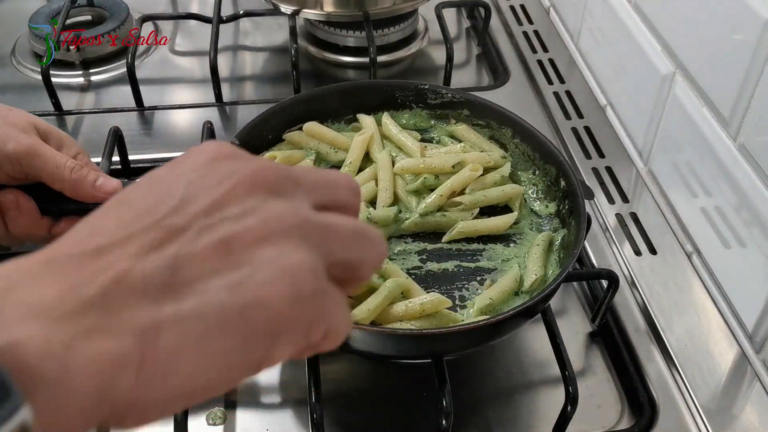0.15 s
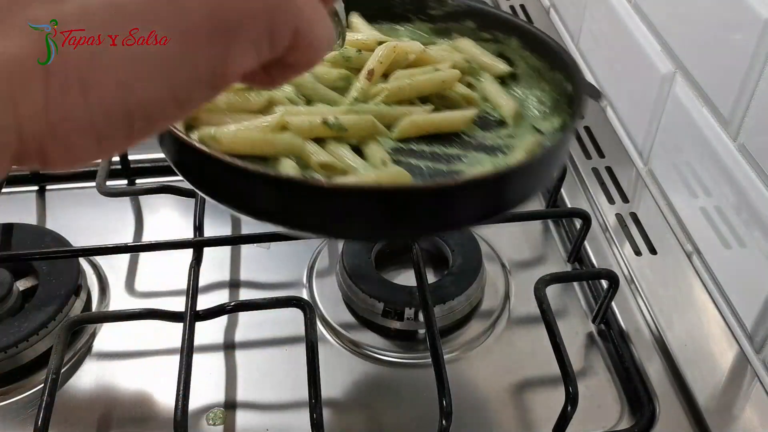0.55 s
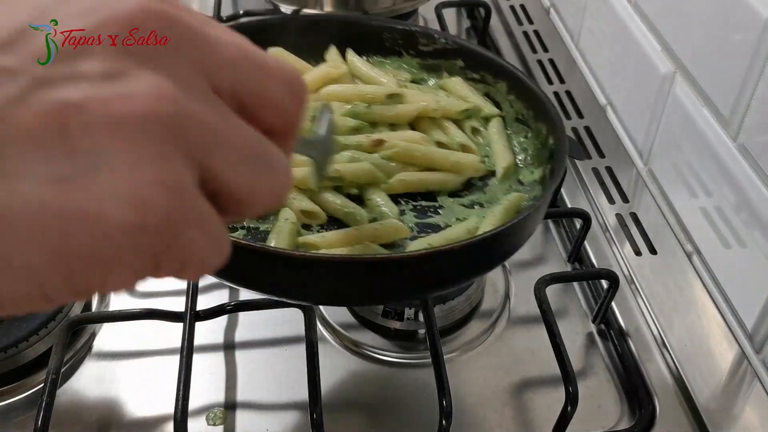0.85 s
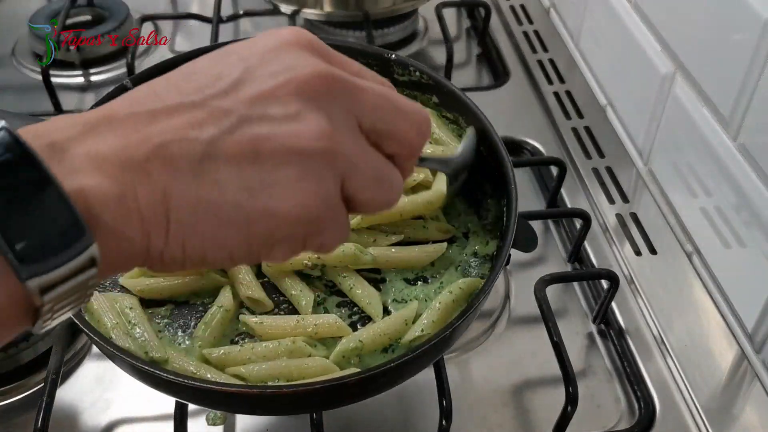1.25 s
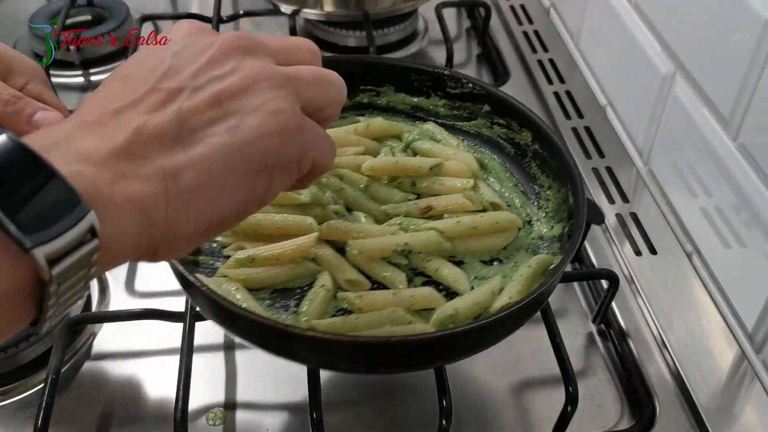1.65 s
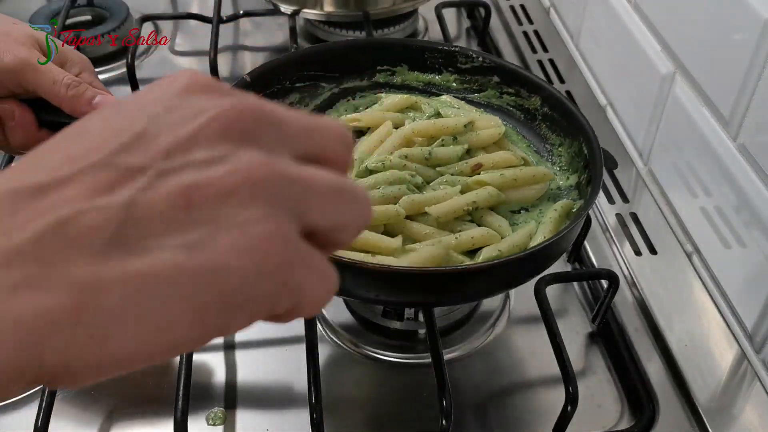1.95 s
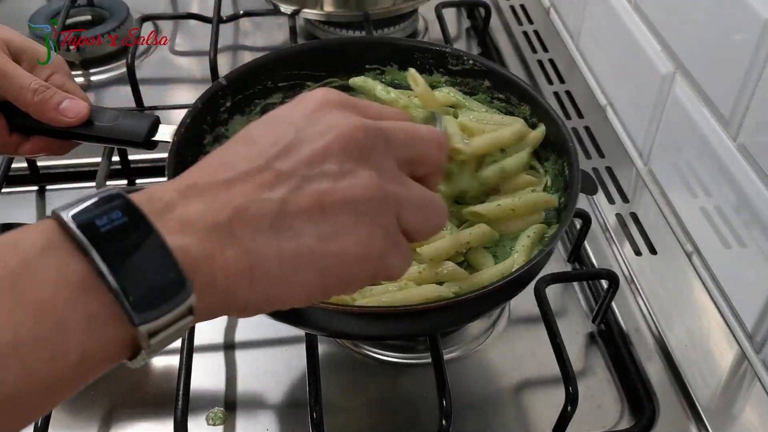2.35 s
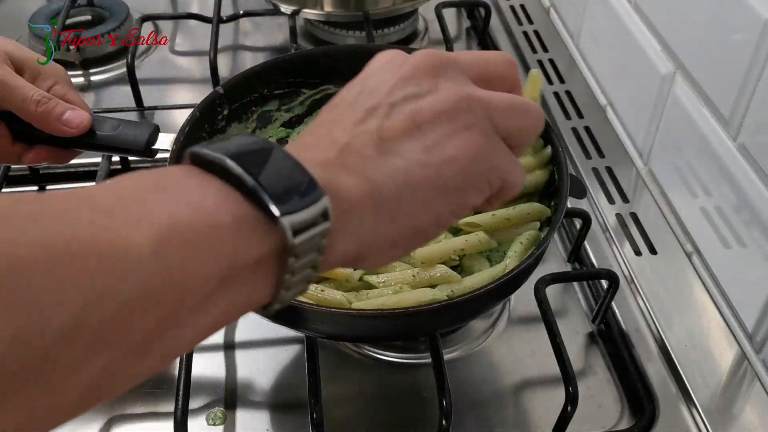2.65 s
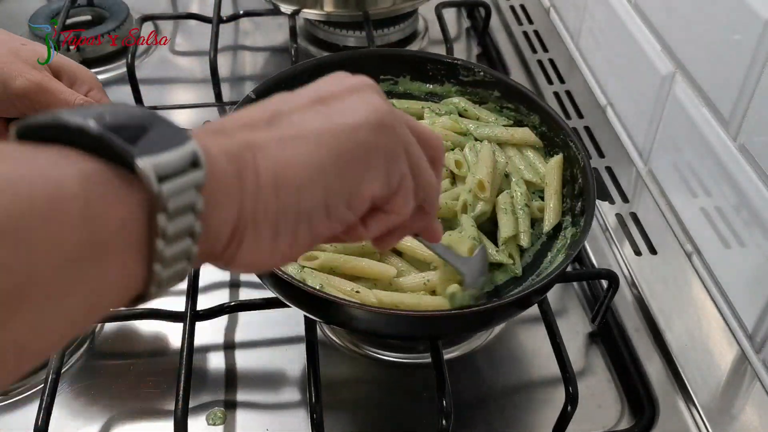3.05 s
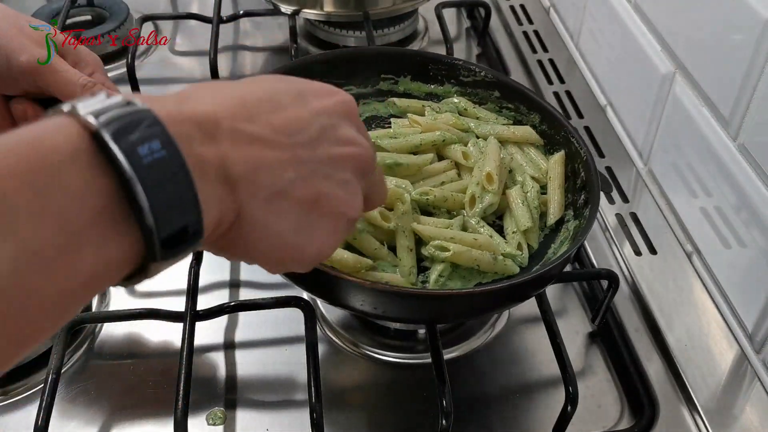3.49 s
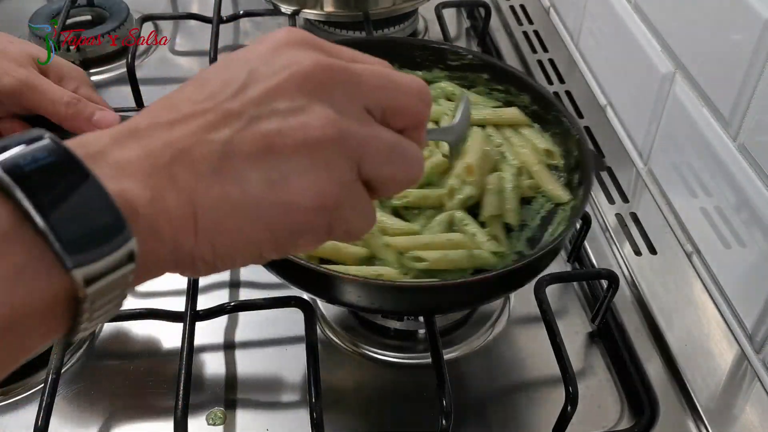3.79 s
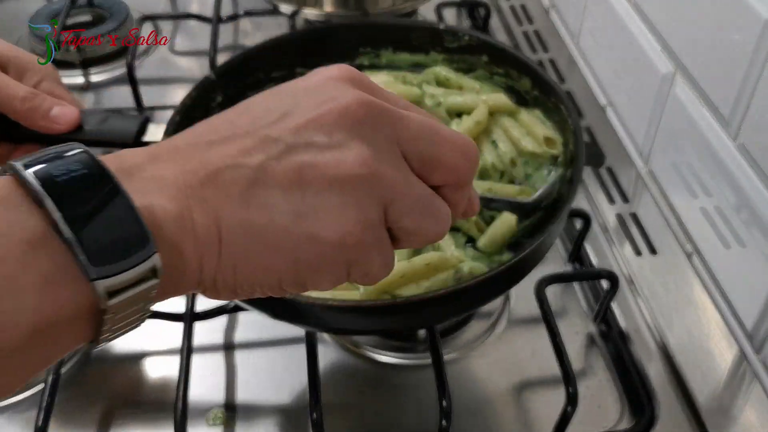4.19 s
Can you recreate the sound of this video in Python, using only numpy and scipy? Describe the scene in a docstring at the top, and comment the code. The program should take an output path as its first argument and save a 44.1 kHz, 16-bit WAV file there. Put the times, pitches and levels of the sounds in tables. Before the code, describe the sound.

A steel utensil stirs creamy pasta in a coated pan. First quick pan-on-grate clacks and a low drag, then isolated hard, dry knocks with short scratchy strokes, a brief metallic ring, and a strong rasping scrape after the midpoint. Soft sticky ticks follow before a last knock. Near microphone, bright room echo, steady low hum beneath.

```python
"""Spoon stirring pasta in a pan.

A steel spoon in a coated pan in a tiled kitchen, heard close in stereo: knocks ring pan and grate modes,
scrapes drive the pan with noisy slips, sauce smacks are tiny tinted bursts, the lifted spoon rings,
a light stroke squeaks, and the pan drags on the stove grate twice, as noise through low resonances.
Wavering motor tones hum over a low rumble of random spectra; sparse dying taps give the echo."""
import sys
import numpy as np
from scipy import signal
from scipy.io import wavfile
from scipy.ndimage import uniform_filter1d

SR = 44100
rng = np.random.default_rng(int(sys.argv[2]) if len(sys.argv) > 2 else 0)


def waveform_to_disk(signal):
    """Save audio, clipped to [-1, 1], as 16-bit WAV at the path in sys.argv[1]."""
    frames = np.transpose(np.atleast_2d(signal))
    scaled = np.clip(frames, -1, 1) * 32767
    samples = np.round(scaled).astype(np.int16)
    wavfile.write(sys.argv[1], SR, samples)


N = 190776  # samples


def gain_of(db):
    """Decibels to gain."""
    return 10 ** (np.asarray(db) / 20)


def evened(x):
    """Scales to rms 1."""
    return x / np.sqrt(np.mean(x ** 2) + 1e-20)


def read(points, f_hz):
    """Interpolates a table on a log-frequency axis."""
    f, value = np.transpose(points)
    return np.interp(np.log(f_hz + 1), np.log(f + 1), value)


def sides(x, lean_db):
    """Spreads a sound over left and right; positive lean_db favours left."""
    return x * gain_of(np.multiply.outer([.5, -.5], lean_db * np.ones(x.shape[-1])))


def add(mix, start_s, sound):
    """Mixes a two-channel sound in at start_s."""
    part = mix[:, round(start_s * SR):][:, :sound.shape[1]]
    part += sound[:, :part.shape[1]]


def drift(top_hz, count):
    """Slow random wander of rms 1: twelve sines up to top_hz, slower ones stronger."""
    t = np.arange(count) / SR
    rates_hz = np.geomspace(top_hz / 20, top_hz, 12)
    return evened(sum(np.sin(2 * np.pi * (f * t + rng.random())) / np.sqrt(f) for f in rates_hz))


def ring(x, f_hz, t60_s):
    """One mode as a decaying complex phasor; a unit click rings with height 1."""
    pole = np.exp((2j * np.pi * f_hz - np.log(1000) / t60_s) / SR)
    return signal.lfilter([1], [1, -pole], x)


def body(force, modes, place, nodal=.6, damping=1.0, beam_rad=.85):
    """Rings all modes: nodal lines weight the drive by place, beam_rad offsets phase between sides."""
    out = 0
    for k, (f_hz, t60_s, db) in enumerate(modes):
        shape = 1 + nodal * np.cos(2 * np.pi * place * 2.92 * np.sqrt(f_hz / 1000))
        mode = ring(force[k % len(force)] * shape, f_hz, t60_s / damping)
        # the offset flips sign between neighbouring modes
        aim = np.exp(1j * beam_rad * (-1) ** k * np.array([[1], [-1]]))
        out = out + gain_of(db) * (mode * aim).imag
    return out


def tinted(x, points):
    """Colours x with a spectrum table; the Hilbert transform of the log gain gives a causal phase."""
    log_gain = np.log(gain_of(read(points, abs(np.fft.fftfreq(4096, 1 / SR)))))
    taps = np.fft.ifft(np.exp(np.conj(signal.hilbert(log_gain)))).real[None, :2048]
    return signal.oaconvolve(x, taps, axes=1)[:, :x.shape[1]]


# rumble spectrum: f/Hz, relative level/dB per Hz
RUMBLE_SPECTRUM = [(13, -27), (22, -14), (130, -0.5), (207, -1.5), (323, -15), (403, -7.5), (438, -13.5),
                   (476, -8.5), (532, -11), (762, -16.5), (1260, -28), (2120, -28), (3130, -34),
                   (15200, -50.5), (16500, -60)]
# left-right correlation of the rumble: f/Hz, correlation/1
RUMBLE_LIKENESS = [(60, 1), (250, 0.79), (500, 0.62), (1000, 0.06), (4000, 0.05), (15000, 0.064)]
# left-right balance of the rumble: f/Hz, left over right/dB
RUMBLE_LEAN = [(30, 7), (100, 4), (200, 2), (400, -2), (2000, 1), (15000, -2)]
RUMBLE_DB_RMS = -38.5


def rumble():
    """Random short-time spectra with mild level patches, nearly alike on both sides in the deep bass."""
    frames, f_hz = N // 512 + 5, np.fft.rfftfreq(2048, 1 / SR)
    a, b, c, d, patches = rng.standard_normal((frames, 1025, 5)).T
    patches = evened(uniform_filter1d(uniform_filter1d(patches, 14, 0), 8, 1))
    same = np.clip(read(RUMBLE_LIKENESS, f_hz), -1, 1)[:, None]
    left = a + 1j * b
    right = same * left + np.sqrt(1 - same ** 2) * (c + 1j * d)
    lean = gain_of(read(RUMBLE_LEAN, f_hz) / 2)[:, None]
    level_db = read(RUMBLE_SPECTRUM, f_hz)[:, None] + 1.3 * patches
    spectra = np.array([left * lean, right / lean]) * gain_of(level_db)
    noise = signal.istft(spectra, nperseg=2048, noverlap=1536)[1][:, :N]
    return gain_of(RUMBLE_DB_RMS) * evened(noise)


# upper motor tones: f/Hz, mean level/dB rms
HUM_TONES = [(74, -53.5), (100, -50.5), (123.8, -47), (206, -51.5), (289, -57.5), (371, -59.5), (470, -55)]
# level of the lowest motor tone: t/s, level/dB rms
LOW_TONE_SWELL = [(0, -49), (1, -64), (1.6, -47.5), (2.4, -43), (3.5, -40.5), (4.33, -49)]
LOW_TONE_HZ = 42.2
PITCH_WAVER, LEVEL_WAVER_DB = 0.00571, 2.0  # rms; pitch as a fraction


def hum():
    """Motor tones waver in pitch and level; the lowest also swells slowly."""
    t, out = np.arange(N) / SR, 0
    swell_db = np.interp(t, *np.transpose(LOW_TONE_SWELL))
    for f_hz, db in [(LOW_TONE_HZ, swell_db)] + HUM_TONES:
        turns = np.cumsum(f_hz * (1 + PITCH_WAVER * drift(3, N))) / SR
        level = np.sqrt(2) * gain_of(db + LEVEL_WAVER_DB * drift(4, N))
        out = out + level * np.sin(2 * np.pi * (turns + rng.random()))
    return sides(out, 3.9)


# kitchen reverberation: f/Hz, t60/s
KITCHEN_DECAY = [(250, 0.36), (1000, 0.7), (3000, 0.66), (8000, 0.49), (15000, 0.49)]


def kitchen(x):
    """Echo: sparse taps of random sign, one in every 20 samples, each band dying at its own speed."""
    taps = np.zeros((2, SR))
    at = np.arange(200, SR - 20, 20) + rng.integers(0, 20, (2, (SR - 201) // 20))
    np.put_along_axis(taps, at, rng.choice([-1., 1.], at.shape), 1)
    f_hz, t, z = signal.stft(taps, SR, nperseg=256)
    decay = gain_of(-60 * t / read(KITCHEN_DECAY, f_hz)[:, None])
    tail = signal.istft(z * decay, SR, nperseg=256)[1]
    tail = tail / np.linalg.norm(tail[0])
    return signal.fftconvolve(x.mean(0)[None], tail, axes=1)[:, :N]


# pan base over the grate: t/s, peak level/dB, rise/s, fall/(dB/s)
DRAGS = [(0.312, -23, 0.06, 104), (4.08, -41.5, 0.11, 80)]
# stove top resonances: f/Hz, width/Hz, level/dB
STOVE_TOP = [(75, 30, -9), (115, 30, -7), (155, 40, -2), (203, 40, 0), (262, 30, -6), (315, 40, -3),
             (360, 30, -6), (481, 45, -7), (550, 50, -8), (750, 150, -12), (1034, 56, -16)]
DRAG_ONSET_DB = -6  # re peak


def drag(start_s, peak_db, rise_s, fall_db_per_s):
    """Judder of the pan base swells, dies away and excites the low resonances of the stove top."""
    t = np.arange(SR // 2) / SR
    judder = rng.standard_normal(len(t))
    boom = 0
    for f_hz, width_hz, level_db in STOVE_TOP:
        t60_s = 1.6 / width_hz
        twice_rung = ring(ring(judder, f_hz, t60_s), f_hz, t60_s).real
        boom = boom + gain_of(level_db) * width_hz ** 1.5 * twice_rung
    db = peak_db + np.minimum(DRAG_ONSET_DB * (1 - t / rise_s), fall_db_per_s * (rise_s - t))
    fade_in = np.minimum(t / .01, 1)
    return start_s, sides(evened(boom) * gain_of(db) * fade_in, 0.39)


# sauce smacks: t/s, peak level/dB, f/Hz, left over right/dB
SAUCE_SMACKS = [(0.0513, -36.5, 6700, -5), (0.23, -41, 5630, -5), (0.363, -42, 5840, 2),
                (0.451, -35.5, 4050, 4), (0.4784, -44, 9000, -7), (0.5502, -40, 4850, 2),
                (0.854, -37.5, 5300, 2), (0.909, -38.5, 6500, 0), (1.5642, -34.5, 7200, -8),
                (1.6056, -37, 6550, -5), (1.7555, -28, 4500, -3), (1.84, -35.5, 14000, -10),
                (2.432, -29.5, 7800, 1), (2.476, -30, 6700, 1), (2.7152, -38, 6600, 4),
                (3.628, -41, 4800, -11), (3.732, -40, 6770, 4), (3.8583, -36, 5540, 4),
                (3.9693, -35.5, 7800, -5), (4.024, -41.5, 13000, -1), (4.072, -41.5, 10900, -2),
                (4.1006, -31.5, 5770, 4), (4.124, -34, 11800, -6), (4.145, -32, 11200, 1.5),
                (4.168, -32.5, 9950, -5)]
SKIRT_LOW_DB, SKIRT_HIGH_DB = -13.5, -27.5  # at a quarter and three times the pitch


def smack(peak_db, f_hz, lean_db):
    """A sauce film snaps: a tiny wet burst around its pitch."""
    t = np.arange(2048) / SR
    burst = rng.standard_normal((3, len(t))) * np.exp(-t / 0.0032)
    colour = [(f_hz / 4, SKIRT_LOW_DB), (f_hz / 1.17, -10), (f_hz, 0),
              (f_hz * 1.15, -10), (f_hz * 3, SKIRT_HIGH_DB)]
    burst = tinted(burst[1:] + 0.43 * burst[0], colour)  # row 0 is common to both sides
    return gain_of(peak_db) * sides(burst / abs(burst).max(), lean_db)


SQUEAK_START_S, SQUEAK_LENGTH_S, SQUEAK_HZ, SQUEAK_T60_S, SQUEAK_DB = 1.5, .12, 1037, .12, -50.5


def squeak():
    """Light rubbing, as noise, keeps one narrow resonance sounding for a moment."""
    count = round(SQUEAK_LENGTH_S * SR)
    tone = ring(rng.standard_normal(count), SQUEAK_HZ, SQUEAK_T60_S).real
    return sides(gain_of(SQUEAK_DB) * evened(tone) * signal.windows.tukey(count, .4), 0)


# spoon modes: f/Hz, t60/s, level/dB
SPOON_MODES = [(1190, .25, -1), (1367, .3, -11), (1755, .45, 1), (2466, .2, -9), (3095, .15, -5),
               (4700, .3, -13), (5728, .3, -15), (6874, .2, -13)]
SPOON_FREE_S, SPOON_STOP_S, SPOON_DB = 2.1449, 2.262, -28


def spoon():
    """The spoon, bounced clear of the pan, rings from one click until it lands."""
    t = np.arange(0, SPOON_STOP_S - SPOON_FREE_S, 1 / SR)
    click = (t == 0)[None] * 1.
    fade_out = np.clip((t[-1] - t) / 0.0059, 0, 1)
    return gain_of(SPOON_DB) * body(click, SPOON_MODES, 0, nodal=0) * fade_out


# scrapes, one table each, first the hiss of the dragging pan, then spoon strokes:
# t/s, rubbing level/dB, share above 5 kHz/dB
SCRAPES = [
    [(0.33, -37.5, -12), (0.42, -52, -24), (0.6, -59, -2)],
    [(1.245, -50, 8), (1.3, -35, -9.5), (1.36, -32, -0.5), (1.41, -43, -18), (1.525, -47.5, -11)],
    [(1.56, -66, 0), (1.62, -49.5, -2.5), (1.68, -52.5, -2.5), (1.74, -64, -9)],
    [(2.275, -23.5, -9.5), (2.361, -22, -11.5), (2.385, -52, -9)],
    [(2.93, -27.5, -13), (2.952, -34, -1.5), (2.988, -21, -5.5), (3.038, -25.5, -5.5), (3.14, -20.5, -4),
     (3.29, -22.5, -4), (3.325, -20, -4.5), (3.374, -18, -2), (3.418, -37, -3), (3.454, -29.5, -0.5),
     (3.55, -51.5, -26)],
]
# rubbing heard straight from the contact: f/Hz, relative level/dB per Hz
RASP_SPECTRUM = [(290, -37.5), (500, -23), (810, -47), (1010, -5.5), (1640, -16.5), (1870, -30), (2160, -9),
                 (6960, -19.5), (15800, -35), (16500, -23)]
# pan modes, rung by scrapes and knocks: f/Hz, t60 at damping 1/s, level/dB
PAN_MODES = [(580, .05, -14), (1015, .036, -2), (1240, .08, -17), (1490, .034, -8), (1780, .03, -9),
             (1910, .02, 2), (2070, .07, -18), (2207, .2, -19), (2290, .06, -16), (2530, .03, -7),
             (2930, .02, -6), (3130, .05, -15), (3770, .03, -12), (3900, .04, -8), (4270, .06, -22),
             (4800, .014, -4), (5110, .07, -20), (5620, .016, -7), (5900, .015, -5), (6500, .01, -8),
             (6880, .014, 2), (7970, .012, -7), (9170, .012, -17), (10600, .008, -16), (11700, .008, -20)]
PLACE_START, PLACE_PER_S = .17, 0.4  # position on the pan, 0-1
CATCH_DB_RMS, CATCH_S = 1.5, 0.0071  # chatter: depth, averaging time


def scrape(rows):
    """Dense uneven slips of the rubbing contact drive the pan and rasp directly."""
    s, *columns = np.transpose(rows)
    t = np.arange(s[0], s[-1] + .2, 1 / SR)
    db, treble_db = (np.interp(t, s, c) for c in columns)
    place = PLACE_START + PLACE_PER_S * (t - s[0])
    # rasp re pan: hard rubbing rings the pan, light rubbing rustles
    rasp_db = np.clip(-38 - db, -9, 2)

    slips = rng.standard_normal((3, len(t)))
    chatter = evened(uniform_filter1d(rng.standard_normal(len(t)), round(CATCH_S * SR)))
    fade_out = np.clip((s[-1] - t) / 0.01, 0, 1)
    fade_in = np.clip((t - s[0]) / 0.0011, 0, 1)
    slips = slips * gain_of(db + CATCH_DB_RMS * chatter) * fade_out * fade_in
    level_rms = np.sqrt(np.mean(slips ** 2))

    # seven grip patterns, shared out among the modes, catch and let go every 30 ms or so
    steps = np.arange(s[0], t[-1] + 0.034, .03)
    grip_db = 2.8 * rng.standard_normal((7, len(steps)))
    grip = np.array([gain_of(np.interp(t, steps, row)) for row in grip_db])
    pan = body(slips[0] * grip, PAN_MODES, place, damping=.9)
    rasp = tinted(slips[1:] + .2 * slips[0], RASP_SPECTRUM)
    sound = evened(pan) + gain_of(rasp_db) * evened(rasp)
    sound = sound / np.sqrt(1 + gain_of(2 * rasp_db))

    # rebalance the bands to the treble share
    low = signal.sosfilt(signal.butter(2, [850, 5000], "band", fs=SR, output="sos"), sound)
    high = signal.sosfilt(signal.butter(4, 5000, "high", fs=SR, output="sos"), sound)
    low_gain = np.sqrt(np.clip(1 - gain_of(2 * treble_db), .02, 1))
    mix = evened(low) * low_gain + evened(high) * gain_of(treble_db)
    return s[0], level_rms * sides(mix, -0.52)


# knocks, pan on grate (first four), then spoon on pan: t/s, crack peak/dB, contact f/Hz,
# level at 16 kHz re contact pitch/dB, contact decay/s, place on the pan/0-1, pan ring peak/dB,
# grate ring gain/dB, left over right/dB
PAN_KNOCKS = [(0.0768, -6.5, 2110, -47, 0.0039, 0, -9.5, -15.5, -5),
              (0.0956, -9.5, 2040, -45.5, 0.012, 0.08, -29, -20, -8),
              (0.1142, -18, 3300, -40, 0.0053, .3, -37, -58, -4),
              (0.3167, -22.5, 1180, -41, 0.0058, 0.5, -19, -27, -6),
              (1.2197, -3, 3850, -28, 0.0031, 0.21, -3, -56, 2),
              (1.235, -12.5, 2170, -38, 0.0067, 0.1, -37, -28, 4),
              (1.2924, -16.5, 1700, -30, 0.01, 0, -30, -48, -5),
              (2.1442, -18, 3330, -24, 0.0055, 0.11, -16, -65, -3.5),
              (2.2652, 2.5, 3140, -33, 0.0022, 0.19, -3.5, -41, 3),
              (2.9006, -3.5, 3660, -2.5, 0.0041, 0.13, -5, -47, -0.5),
              (4.3147, -2.5, 2466, -25, 0.0048, 0.37, -12.5, -28, 0.5)]
# cast bars of the grate: f/Hz, t60/s, level/dB
GRATE_BARS = [(996, .3, -9), (1491, .2, -9), (1615, .4, -9), (2207, .22, 2), (2993, .22, -11),
              (3370, .3, -13), (3542, .3, -18), (3811, .2, -17), (4350, .28, -21), (5631, .2, -22)]


def knock(crack_db, f_hz, treble_db, contact_s, place, pan_db, grate_db, lean_db):
    """A short rough contact cracks and rings pan and grate."""
    t = np.arange(SR * 2 // 5) / SR
    burst = rng.standard_normal((3, len(t))) * np.exp(-t / contact_s) * np.minimum(t / 0.0012, 1)
    contact = [(400, -24), (f_hz / 2.4, -12), (f_hz / 1.18, -4), (f_hz, 0),
               (f_hz * 1.005, -4), (f_hz * 1.8, -12), (16000, treble_db)]
    crack = tinted(burst[1:] + 0.34 * burst[0], contact)
    pan = tinted(body(burst[:1], PAN_MODES, place, damping=1.27), contact)
    click = (t == 0)[None] * 1.
    grate = tinted(body(click, GRATE_BARS, 0, nodal=0), contact)
    sound = gain_of(crack_db) * crack / abs(crack).max()
    sound = sound + gain_of(pan_db) * pan / abs(pan).max()
    return sides(sound + gain_of(grate_db) * grate, lean_db)


def scene():
    """Cooking sounds with their echo, over hum and rumble."""
    near = np.zeros((2, N))
    for start_s, *row in PAN_KNOCKS:
        add(near, start_s, knock(*row))
    add(near, SPOON_FREE_S, spoon())
    add(near, SQUEAK_START_S, squeak())
    for rows in SCRAPES:
        add(near, *scrape(rows))
    for start_s, *row in SAUCE_SMACKS:
        add(near, start_s, smack(*row))
    for when, size, pitch, side in rng.random((45, 4)):  # fainter smacks at random moments
        add(near, when * N / SR, smack(-54.5 + 10.0 * size, 5000 + 8000 * pitch, 8 * side - 4))
    for row in DRAGS:
        add(near, *drag(*row))
    return near + gain_of(-6.0) * kitchen(near) + rumble() + hum()


EDGE_HZ = 15800


def record(dry):
    """Soft overload (tanh), then the band limit of the recorder."""
    lowpass = signal.firwin(511, EDGE_HZ, window=("kaiser", 9), fs=SR)
    return signal.oaconvolve(np.tanh(dry), lowpass[None], "same")


dry = scene()
out = record(dry)
waveform_to_disk(out)
```